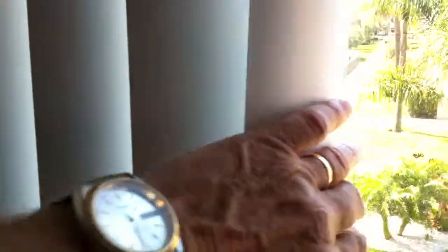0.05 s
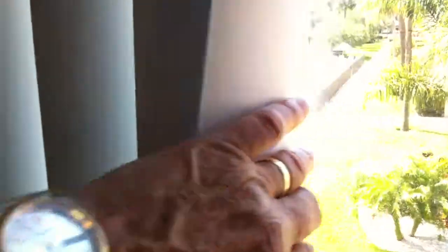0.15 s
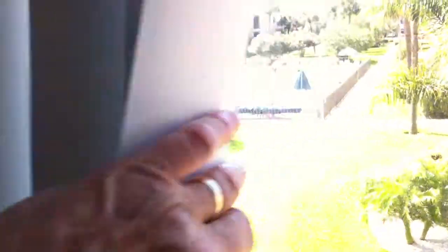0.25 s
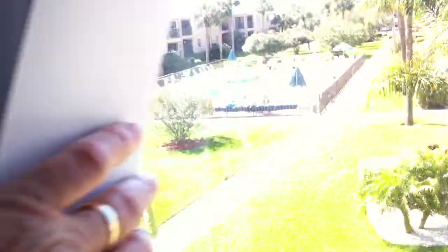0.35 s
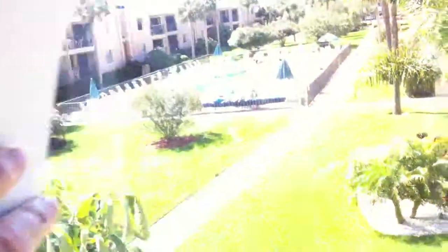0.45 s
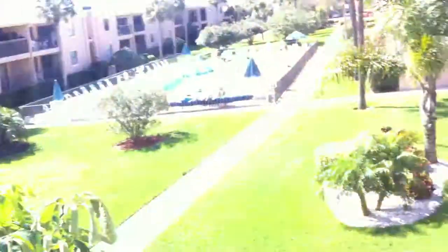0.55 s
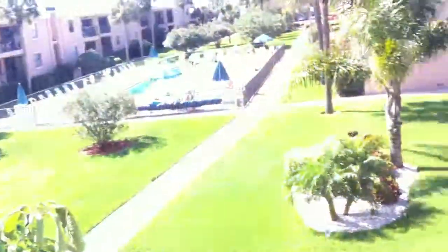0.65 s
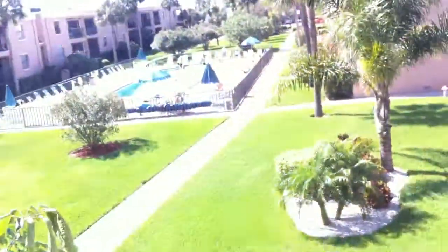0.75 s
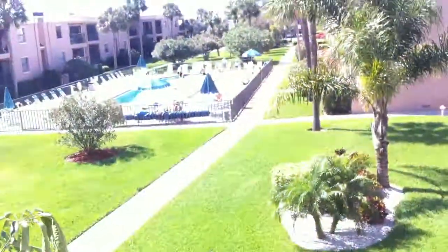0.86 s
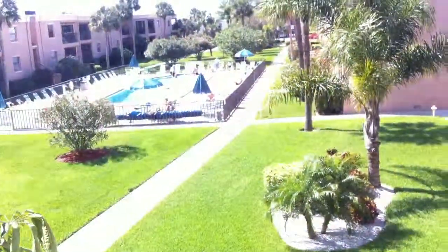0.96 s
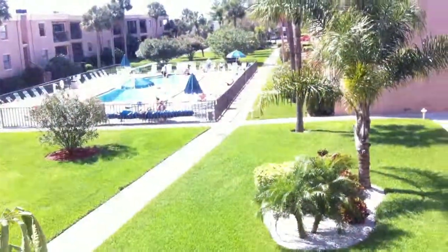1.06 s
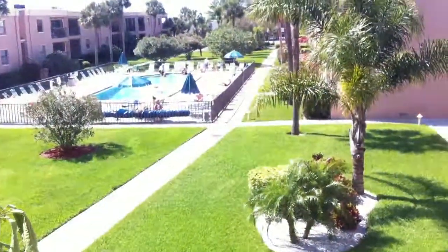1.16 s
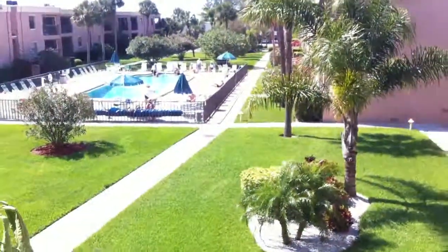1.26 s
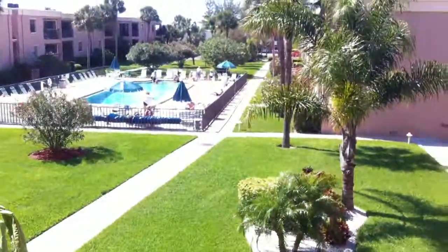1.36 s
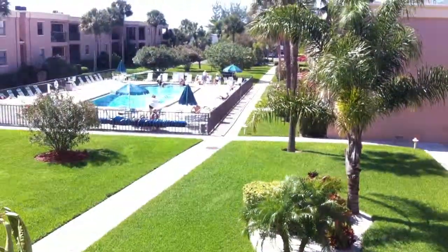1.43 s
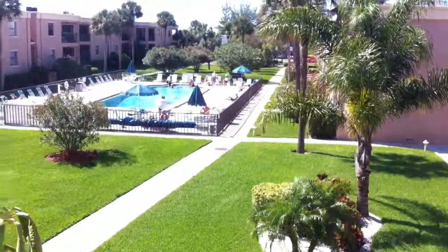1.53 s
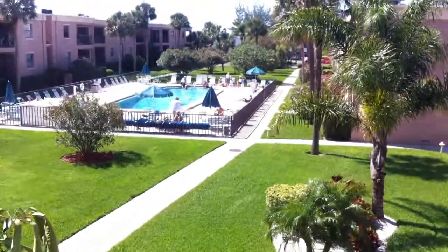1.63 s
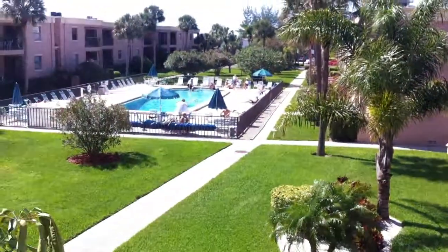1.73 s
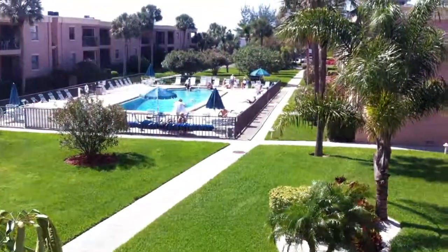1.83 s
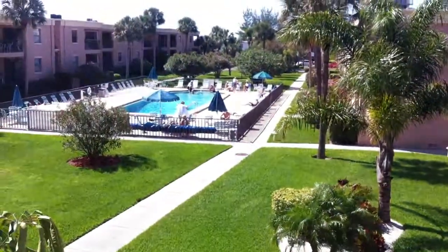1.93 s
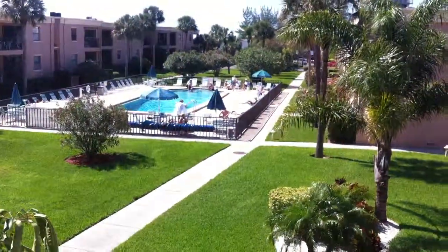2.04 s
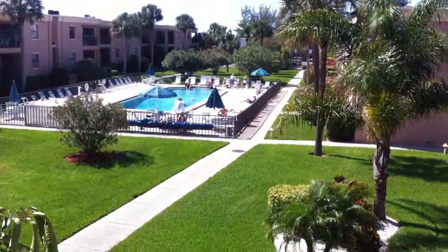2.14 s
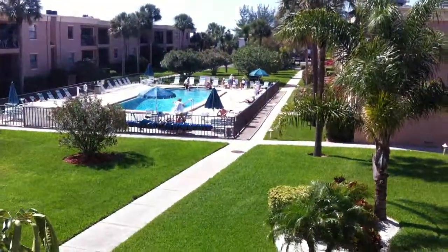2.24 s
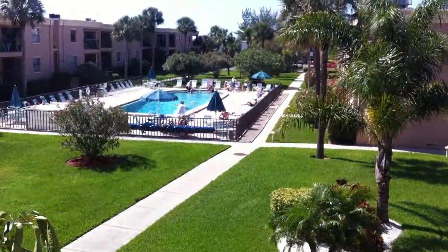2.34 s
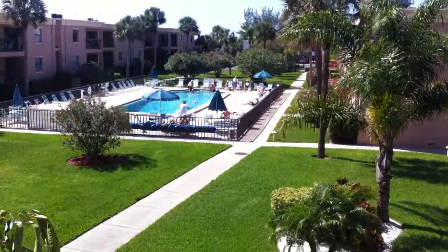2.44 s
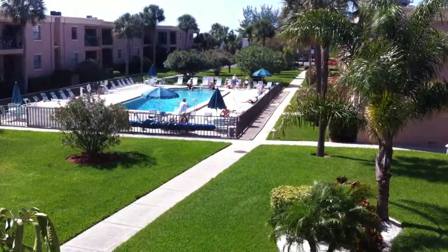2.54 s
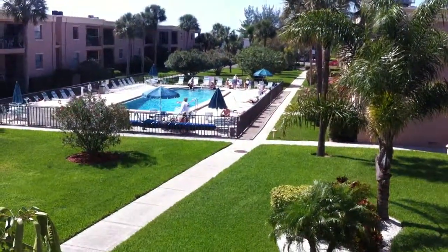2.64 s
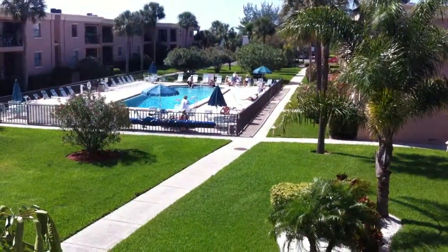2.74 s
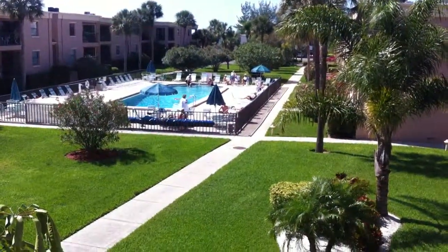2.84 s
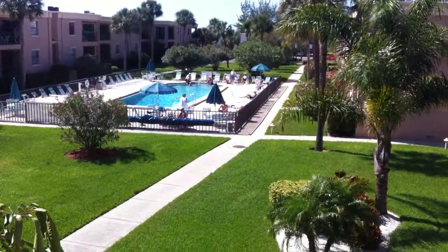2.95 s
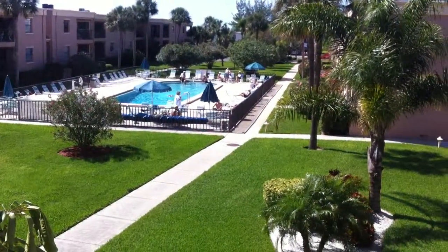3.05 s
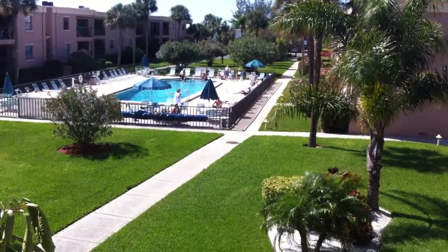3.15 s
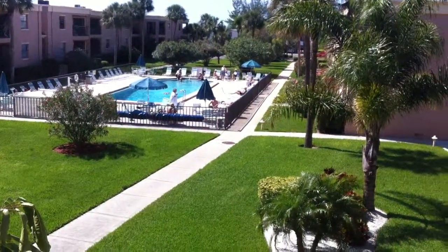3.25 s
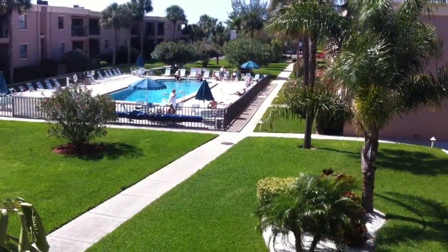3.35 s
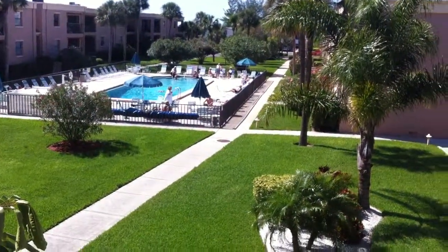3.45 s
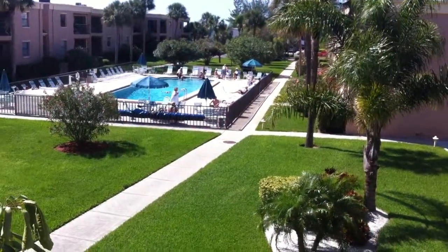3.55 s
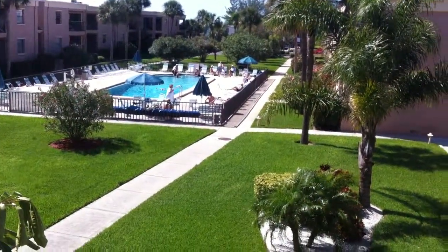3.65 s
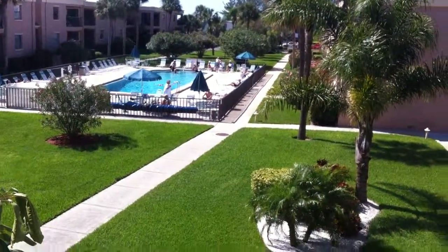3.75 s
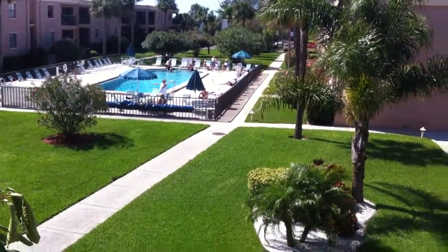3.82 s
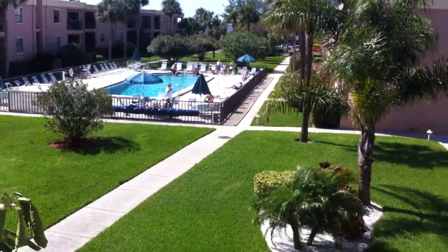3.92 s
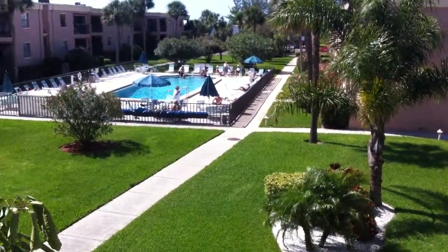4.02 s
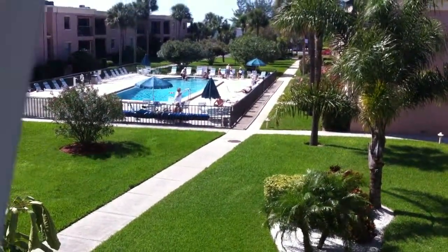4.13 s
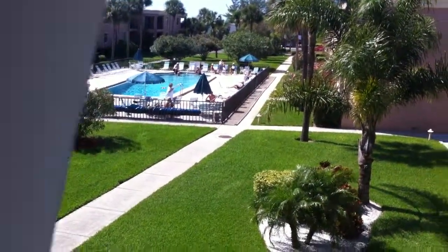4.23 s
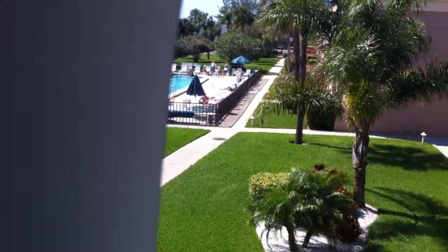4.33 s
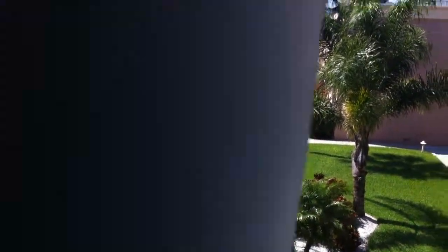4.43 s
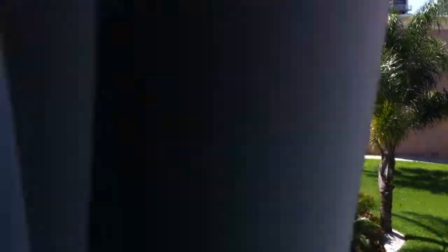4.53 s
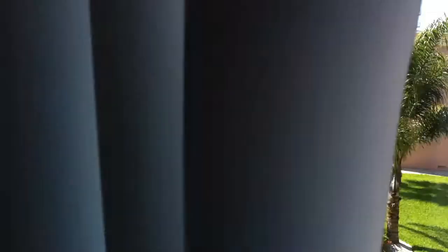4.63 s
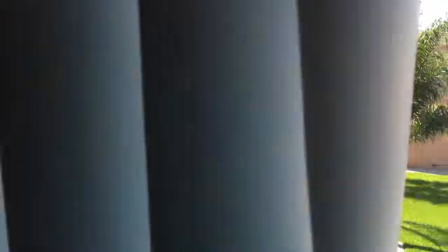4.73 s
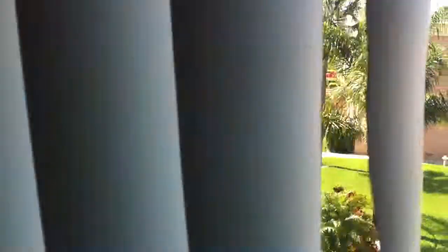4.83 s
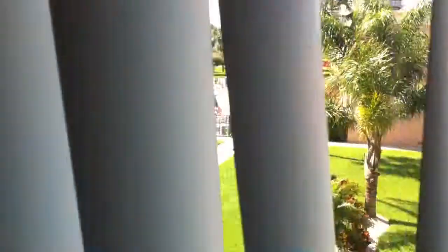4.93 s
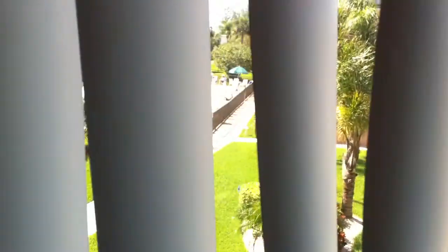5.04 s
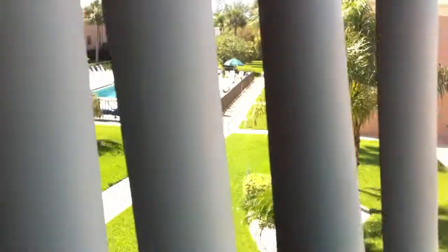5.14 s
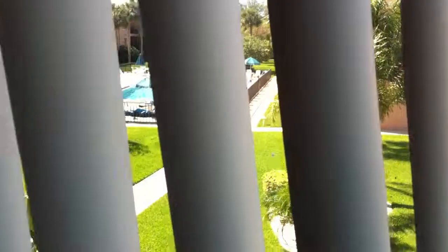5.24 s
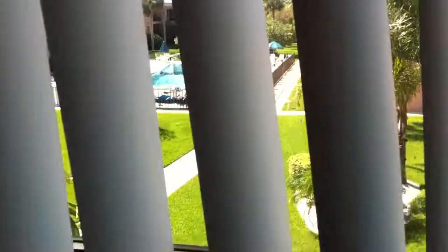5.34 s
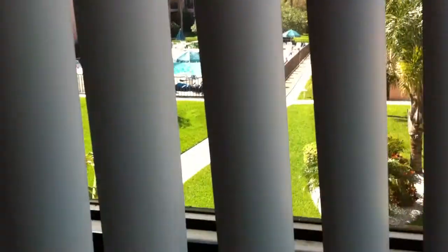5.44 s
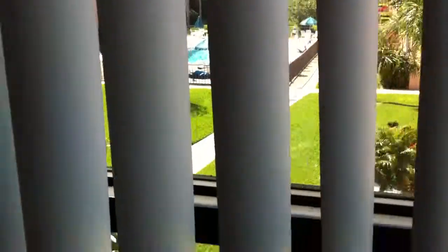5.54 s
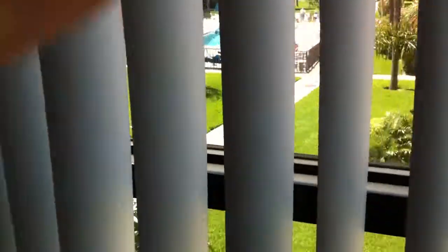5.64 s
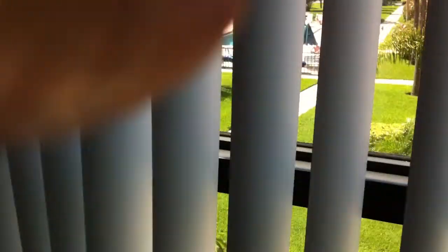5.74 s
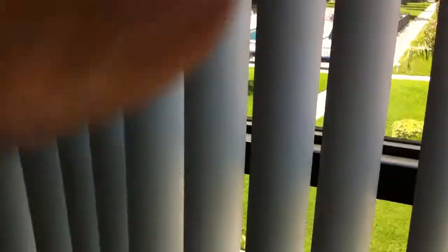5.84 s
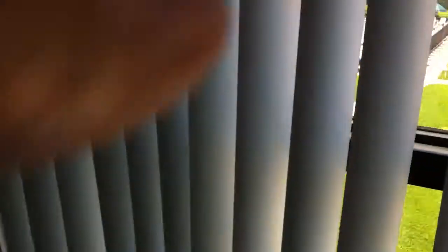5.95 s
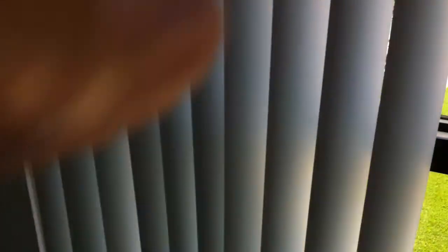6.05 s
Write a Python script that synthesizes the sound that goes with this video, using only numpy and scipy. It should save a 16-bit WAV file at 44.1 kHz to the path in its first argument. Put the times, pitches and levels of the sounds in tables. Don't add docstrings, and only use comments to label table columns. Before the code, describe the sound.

A dry, close clatter of vertical plastic blind slats in a small quiet room. A snap and light taps start at once; from about 0.28 to 0.46 seconds the slats are shoved together in hard, bright slaps and snaps with gritty scraping, and another strong slap lands at 0.72. Smaller clicks and rattles trail on past 1 second, with a firmer clack near 1.44 and softer, spaced taps until 2.5. A slap at 2.7 leads into tiny ticks, fading by 3.4 to near silence over low rumble and faint hiss. A duller clack at 3.9 brings a thin scrape, then clicks around 4.2. The released slats knock hollowly from 4.46, densest around 4.55, with another strong clack at 4.96 and a soft puff of air near 5. Sparse knocks at 5.6 and 5.8 and light scraping finish by 6 seconds, with a short room tail.

```python
import sys
import numpy as np
from scipy import signal
from scipy.fft import rfft, irfft
from scipy.io import wavfile
from scipy.ndimage import uniform_filter1d

SR = 44100
rng = np.random.default_rng(int(sys.argv[2]) if len(sys.argv) > 2 else 0)


def inscribe(sig):
    pcm = np.round(np.clip(np.atleast_2d(sig).T, -1, 1) * 32767)
    wavfile.write(sys.argv[1], SR, pcm.astype(np.int16))


def voltage_ratio(decibels):
    exponent = np.asarray(decibels, float) / 20
    return 10 ** exponent


N = 268128
LONG = 6000

# (time [s], peak level [dB], centre of the colour [Hz], contact [ms])
CRACKS = [
    (0.2777, -45, 4200, 0.38),
    (0.9837, -28.5, 3600, 0.35),
    (1.1981, -34, 3350, 0.3),
    (3.2891, -45.5, 3730, .35),
]
# (time [s], peak level [dB], pitch [Hz], t60 [s])
HELD_RINGS = [(0.284, -25, 646, 0.036), (0.284, -34.5, 1810, 0.09), (0.307, -33, 1650, 0.045),
              (0.374, -23, 2600, 0.03), (0.374, -33, 2440, 0.029), (0.386, -32, 1840, 0.045),
              (0.409, -31.5, 611, 0.068), (0.413, -28, 3120, 0.04), (0.415, -22.5, 2300, 0.022),
              (0.456, -34, 1530, 0.034), (0.463, -38, 2260, 0.023), (0.465, -37, 1920, 0.035),
              (0.722, -30, 1326, 0.11), (0.722, -29.5, 1177, 0.066), (0.722, -22, 1916, 0.033),
              (0.723, -30, 1570, 0.063), (0.723, -22.5, 1810, 0.029), (0.724, -32, 1680, 0.051),
              (0.725, -27.5, 447, 0.11), (0.729, -28, 570, 0.031), (0.853, -22, 1760, 0.029),
              (0.92, -36, 1715, 0.037), (0.928, -38, 407, 0.067), (1.436, -42, 853, 0.11),
              (1.437, -40, 1580, 0.046), (1.438, -30, 1515, 0.047), (1.441, -29, 630, 0.052),
              (1.75, -44, 1180, 0.089), (1.751, -42, 496, 0.18), (1.764, -44, 297, 0.088),
              (1.781, -36.5, 635, 0.046), (2.103, -46.5, 850, 0.045), (2.119, -48, 398, 0.11),
              (2.193, -49.5, 830, 0.1), (2.398, -44, 860, 0.095), (2.435, -38, 1075, 0.035),
              (2.436, -42, 555, 0.038)]
# (time [s], peak level [dB], pitch [Hz], t60 [s])
LATE_RINGS = [(2.704, -44, 632, 0.23), (2.704, -37, 1433, 0.05), (2.705, -30, 1914, 0.029),
              (2.706, -46, 1780, 0.028), (2.707, -40, 1123, 0.12), (3.896, -41.5, 1568, 0.091),
              (3.896, -34.5, 1316, 0.053), (3.897, -40, 874, 0.07), (3.898, -40.5, 1057, 0.069),
              (3.9, -46.5, 618, 0.31), (4.462, -44, 649, 0.15), (4.464, -38, 428, 0.088),
              (4.465, -39, 1114, 0.1), (4.469, -35, 258, 0.098), (4.538, -29, 1500, 0.039),
              (4.541, -28.5, 1030, 0.066), (4.547, -29.5, 653, 0.21), (4.56, -28, 1628, 0.072),
              (4.563, -30, 397, 0.062), (4.563, -29.5, 512, 0.11), (4.565, -37, 430, 0.07),
              (4.567, -37, 260.4, 0.29), (4.625, -38, 390, 0.089), (4.625, -37.5, 506, 0.12),
              (4.625, -32.5, 646, 0.055), (4.726, -38.5, 1740, 0.035), (4.726, -38, 2250, 0.029),
              (4.731, -39.5, 257, 0.11), (4.957, -27, 942, 0.055), (4.959, -31.5, 724, 0.062),
              (4.961, -30, 1047, 0.05), (4.962, -30, 1390, 0.032), (4.963, -28.5, 480, 0.035),
              (4.964, -34.5, 2060, 0.11), (5.596, -43, 1370, 0.099), (5.598, -37, 1021, 0.082),
              (5.6, -46, 1115, 0.07), (5.601, -46, 357, 0.085), (5.603, -35, 1520, 0.038),
              (5.815, -37, 830, 0.044), (5.815, -48, 1160, 0.1), (5.816, -42, 1250, 0.054),
              (5.818, -42.5, 1620, 0.095), (5.82, -39, 1010, 0.038), (5.83, -39, 1400, 0.046)]


def evened(x):
    return x / np.sqrt(np.mean(x ** 2) + 1e-20)


def topped(x):
    return x / (abs(x).max() + 1e-12)


def read(points, hz):
    f, value = np.transpose(points)
    return np.interp(np.log(hz + 1), np.log(f + 1), value)


def coloured(x, points, tilt_db=0):
    hz = np.fft.rfftfreq(len(x), 1 / SR)
    gain_db = read(points, hz) + tilt_db * np.log2(hz / 3000 + 1e-3)
    return irfft(rfft(x) * voltage_ratio(gain_db), len(x))


def filtered(x, order, hz, kind="low"):
    return signal.sosfilt(signal.butter(order, hz, kind, fs=SR, output="sos"), x)


def place(out, start, sound):
    out[start:start + len(sound)] += sound


def ring(modes, t, luck, detune, spread_db):
    hz, db, t60 = np.transpose(modes)[:, :, None]
    favour, shift = luck[:2 * len(hz)].reshape(2, -1, 1)
    level = voltage_ratio(db + spread_db * favour - 60 * t / t60)
    return (level * np.sin(2 * np.pi * hz * (1 + detune * shift) * t)).sum(0)


def crowd(noise, rattle, t, t60):
    energy = signal.fftconvolve(rattle ** 2, voltage_ratio(-120 * t / t60))[:len(t)]
    return evened(noise * np.sqrt(abs(energy)))


def hush():
    # (frequency [Hz], level [dB per Hz])
    hush_colour = [(12, -52.5), (20, -24), (27, -34), (53, -20), (91, -19.5), (113, -11.5), (187, -2.5),
                   (228, -13), (255, -6), (499, -17), (802, -18.5), (1330, -19), (16000, -26.5)]
    drift = evened(uniform_filter1d(uniform_filter1d(rng.standard_normal(N), 5000), 5000))
    level = voltage_ratio(-62.5) * voltage_ratio(.6 * drift)
    return level * evened(coloured(rng.standard_normal(N), hush_colour))


def room(x):
    # (frequency [Hz], t60 [s])
    decay = [(150, 0.69), (400, 0.43), (1000, 0.28), (2800, 0.31), (7000, 0.15), (14000, 0.27)]
    taps = np.zeros(SR // 2)
    at = np.arange(150, len(taps) - 20, 20)
    taps[at + rng.integers(0, 20, len(at))] = rng.choice([-1., 1.], len(at))
    hz, t, z = signal.stft(taps, SR, nperseg=256)
    fade = voltage_ratio(-60 * t / read(decay, hz)[:, None])
    tail = signal.istft(z * fade, SR, nperseg=256)[1]
    return signal.fftconvolve(x, tail / np.linalg.norm(tail))[:N]


def pushes():
    # (time [s], peak level [dB])
    puffs = [(.4, -65), (.495, -69), (0.723, -66), (.92, -65), (1.435, -66), (2.426, -74), (2.706, -73),
             (3.898, -71.5), (4.595, -66), (4.69, -70), (4.97, -64), (5.01, -57), (5.83, -72)]
    puff_hz, puff_s, lead = 46.2, 0.01, 2000
    out, t = np.zeros(N + LONG), np.arange(-lead, LONG - lead) / SR
    puff = np.exp(-.5 * (t / puff_s) ** 2) * np.sin(2 * np.pi * puff_hz * t)
    for s, db in puffs:
        place(out, round(s * SR) - lead, voltage_ratio(db) * puff)
    return out[:N]


def carriers():
    # (time [s], peak level [dB])
    ticks = [
        (2.75, -62),
        (2.917, -60),
        (2.992, -53),
        (3.062, -62),
        (3.173, -53),
        (3.4, -58),
    ]
    # (pitch [Hz], level [dB], t60 [s])
    modes = [(1080, -3, 0.048), (2420, 1, 0.043), (3800, -3, .05), (5600, 6, 0.072), (9600, 6, .04)]
    out, t = np.zeros(N + LONG), np.arange(LONG) / SR
    for s, db in ticks:
        touch = rng.standard_normal(300) * np.exp(-t[:300] / 0.0023)
        body = ring(modes, t, rng.standard_normal(10), detune=.006, spread_db=1)
        tick = signal.fftconvolve(body, touch)[:LONG]
        place(out, round(s * SR), voltage_ratio(db + 5.0) * topped(tick))
    return out[:N]


def scrape():
    # (brightness [dB], weight [dB], pressure curve of (time [s], level [dB]))
    strokes = [(1.5, 4, [(0, -43), (.06, -56.5), (.27, -64.5)]), (4.5, -5.5, [(.283, -32.5), (.332, -35),
               (.456, -32), (.562, -39.5), (.878, -51), (.98, -48.5)]), (1, 7, [(.98, -52), (1.42, -62)]),
               (-17, 5.5, [(1.42, -43.5), (1.55, -74), (1.74, -63)]), (0, 6, [(1.74, -50.5), (1.914, -63.5),
               (2.38, -66), (2.466, -76), (2.7, -99)]), (-9, 13, [(2.76, -67), (3, -92)]),
               (5.5, -1, [(3.897, -58), (3.948, -53.5), (3.984, -47), (4.032, -48), (4.054, -55.5),
               (4.16, -58)]), (4, -9.5, [(4.16, -47), (4.226, -53), (4.36, -48.5), (4.55, -45)]),
               (-5, 5.5, [(4.55, -33.5), (4.61, -50), (4.798, -56), (4.95, -64)]), (5, 5.5, [(4.96, -53),
               (5.178, -62), (5.438, -63.5), (5.55, -70)]), (9.5, 13, [(5.6, -85), (5.678, -69),
               (5.81, -72), (6.08, -68)])]
    # (frequency [Hz], level [dB per Hz])
    scrape_colour = [(59, -50), (100, 4), (872, 1), (1170, 4.5), (1450, -1.5), (1680, 5.5), (2930, 3.5),
                     (3400, 2), (9410, -6.5), (16000, -14.5)]
    t, gain, bright, weight = np.arange(N) / SR, np.zeros(N), np.zeros(N), np.zeros(N)
    for bright_db, weight_db, rows in strokes:
        s, db = np.transpose(rows)
        on = (t >= s[0]) & (t < s[-1])
        gain[on] = voltage_ratio(np.interp(t[on], s, db)) * signal.windows.tukey(on.sum(), .02)
        bright[on], weight[on] = voltage_ratio(bright_db), voltage_ratio(weight_db)
    clumps = evened(uniform_filter1d(uniform_filter1d(rng.standard_normal(N), 160), 160))
    slips = voltage_ratio(2.1 * rng.exponential(1, N).clip(0, 4))
    grit = rng.standard_normal(N) * voltage_ratio(.8 * clumps) * slips
    grit = evened(coloured(grit, scrape_colour))
    low = signal.sosfiltfilt(signal.butter(2, 1300, fs=SR, output="sos"), grit)
    high = signal.sosfiltfilt(signal.butter(2, 6000, "high", fs=SR, output="sos"), grit)
    return gain * (grit - low - high + weight * low + bright * high)


def clicks():
    # (time [s], peak level [dB])
    flicks = [(0.2844, -21), (.4559, -12), (.7227, -11), (1.1984, -28), (1.583, -38.5), (1.631, -32.5),
              (3.2902, -33.5), (4.1647, -31), (4.192, -31), (4.2598, -21), (4.565, -25), (5.0512, -24)]
    rows = [(s, db + 9, hz, 0.000157) for s, db, hz, _ in CRACKS]
    rows += [(s, db, 10040, .00004) for s, db in flicks]
    out, t = np.zeros(N + LONG), np.arange(100) / SR
    for s, db, hz, width in rows:
        u = t - 4 * width
        packet = np.exp(-.5 * (u / width) ** 2) * np.sin(2 * np.pi * hz * u)
        place(out, round(s * SR), voltage_ratio(db) * packet)
    return out[:N]


def ringing():
    # (time [s], peak level [dB], pitch [Hz])
    bumps = [(.292, -39, 272), (0.387, -37, 274), (0.742, -30.5, 157), (.752, -39, 366), (1.123, -38, 194),
             (1.323, -44, 190), (1.628, -43, 175), (3.906, -39, 202), (4.544, -34, 259), (4.724, -38, 190),
             (4.96, -32.5, 190), (5.621, -43.5, 361), (5.646, -48.5, 400)]
    out, t = np.zeros(N + LONG), np.arange(LONG) / SR
    for s, db, hz, t60 in HELD_RINGS + LATE_RINGS + [(s, db, hz, .07) for s, db, hz in bumps]:
        rise = 1 - np.exp(-t / (0.0016 * (1000 / hz) ** 0.72))
        tone = rise * np.sin(2 * np.pi * hz * t)
        place(out, round(s * SR), voltage_ratio(db + 4.5 - 60 * t / t60) * tone)
    return out[:N]


def contacts():
    # (time [s], peak level [dB], loudest ring [Hz], thump [dB re peak])
    taps = [(0.1974, -38, 2430, -14), (0.4124, -15, 2950, -10), (0.895, -33, 1900, -4.5),
            (0.9915, -28, 1640, -24), (1.3232, -48, 953, -23), (1.499, -43, 2430, -3),
            (1.889, -38.5, 1086, -20), (1.9142, -41.5, 2860, -10), (1.95, -42.5, 995, -15),
            (2.0278, -59, 2130, -18), (2.1238, -46.5, 2490, -5), (2.2148, -42.5, 2370, -4),
            (2.244, -37, 2400, -19), (2.435, -28.5, 984, -11.5), (2.4493, -42.5, 2830, -4.5),
            (2.4878, -48, 2330, -7), (2.517, -51, 2340, -11), (2.69, -45.5, 2500, -11),
            (2.749, -37, 2420, -1.5), (2.7981, -58, 1910, -5), (3.309, -55, 1650, -23),
            (3.3484, -42.5, 2310, -13.5), (3.3856, -49, 2300, -23), (3.641, -53.5, 2260, -9.5),
            (4.2783, -33, 3190, -16), (4.486, -26.5, 4330, -13.5), (4.6952, -33, 3170, -8),
            (5.3481, -52, 2600, -13), (5.793, -40.5, 1965, -33)]
    # (time [s], peak level [dB], loudest ring [Hz], tick [dB re peak])
    glances = [(0.096, -46.5, 2330, -31), (0.1523, -42, 2560, -22), (0.3738, -12.5, 2510, -12),
               (.537, -28, 2660, -11.5), (0.663, -31, 2510, -30), (0.7978, -35, 2370, -39),
               (0.853, -22, 1740, -7), (1.039, -26.5, 1670, -18.5), (1.15, -34.5, 2390, -18.5),
               (1.1975, -28.5, 1620, -14.5), (1.2167, -40, 1790, -24.5), (1.274, -36.5, 1010, -24),
               (1.721, -42.5, 2300, -10), (1.804, -41.5, 2300, -29), (2.1779, -36.5, 2300, -16.5),
               (2.261, -37.5, 2420, -21.5), (2.463, -39, 2390, -23), (2.6509, -34.5, 2910, -20),
               (2.666, -50, 2900, -31), (2.9162, -52, 1120, -11), (2.992, -51, 1090, -10.5),
               (3.0602, -43, 2300, -29), (3.073, -47, 2390, -13.5), (3.1734, -56, 1030, -2.5),
               (3.1986, -48, 2180, -10.5), (3.239, -51.5, 2420, -15), (3.3981, -47.5, 2870, -15),
               (3.413, -48.5, 2300, -19.5), (4.759, -37.5, 3050, -14.5), (4.808, -29, 2650, -28)]
    # (time [s], peak level [dB], centre of the colour [Hz], tick [dB re peak], contact [ms])
    slaps = [(.055, -42.5, 890, -38, 2.5), (0.181, -44.5, 1660, -23, 2.4),
             (0.285, -24.5, 1770, -5, 2.1), (0.3886, -13, 1890, -17, 3.6),
             (0.7212, -10, 1740, -19, 9.2), (0.9115, -29.5, 1440, -10.5, 3.3),
             (0.92, -24, 1660, -19, 2.4), (1.1127, -36, 1990, -11.5, 5.3), (1.4248, -37, 820, -48, 12),
             (1.4371, -21, 1460, -27, 3), (1.5798, -39, 3350, -17, 1.9),
             (1.6285, -50.5, 970, -5.5, 12), (1.7495, -24, 1165, -28, 2.1),
             (1.7741, -30, 930, -28, 5.5), (2.1008, -40, 910, -19.5, 21),
             (2.192, -30.5, 890, -23.5, 7.2), (2.3956, -34.5, 910, -36, 4.9),
             (2.7035, -21.5, 1810, -35, 5.2), (2.7683, -51.5, 890, -9.5, 10.6),
             (3.8944, -25.5, 1240, -32, 10.5),
             (4.193, -38.5, 3220, -2.5, 4.9), (4.2528, -37, 2400, -7, 13),
                  (4.4598, -19, 1110, -27, 9.1), (4.5338, -15, 1430, -27.5, 3.9),
                  (4.5464, -11.5, 1030, -27, 3.9), (4.563, -10, 1695, -45, 2),
                  (4.613, -25.5, 1860, -28.5, 21), (4.629, -25.5, 1280, -26.5, 3.2),
                  (4.6755, -32, 1710, -39, 2.9), (4.725, -26, 1810, -24, 6.8),
                  (4.7802, -44.5, 3000, -13, 13), (4.9184, -44.5, 2170, -16.5, 11),
                  (4.957, -13.5, 1006, -27.5, 3.1), (4.9687, -22.5, 940, -20.5, 1.4),
                  (4.994, -30, 1570, -5, 8.6), (5.301, -47, 1670, -11, 3.5), (5.5943, -26, 1384, -54, 2.4),
                  (5.6024, -29, 1120, -31, 6.5), (5.666, -47.5, 1030, -24, 4.2),
                  (5.8137, -22.5, 1030, -40.5, 12), (5.882, -47, 1560, -29, 19)]
    # (time [s], peak level [dB], centre of the colour [Hz], tick [dB re peak])
    snaps = [(0.02, -30, 4400, -9), (0.304, -32.5, 4840, 4), (.324, -37, 3400, 2.5), (0.343, -40, 3540, 10),
             (0.3678, -22, 2560, -1), (0.4566, -12.5, 1500, -13), (0.463, -19.5, 2230, -16),
             (0.772, -36, 1720, -3.5), (1.05, -29.5, 2480, -16), (1.0704, -29.5, 1660, -17.5),
             (1.164, -29.5, 2280, -14.5), (1.262, -35.5, 2350, -15.5), (1.284, -35, 1970, -30),
             (1.35, -42, 1690, -8), (1.611, -49.5, 940, -12), (1.6554, -45, 2400, -3),
             (1.815, -48.5, 1660, -5.5), (2.1701, -41, 2630, -12), (4.163, -32.5, 2980, -16),
             (4.982, -32, 1440, -10), (5.0486, -41, 1380, -6.5), (5.1313, -26.5, 4830, -13.5),
             (5.169, -39, 2120, -33), (5.1886, -33, 2370, -18), (5.456, -50, 2450, -20),
             (5.702, -42.5, 2300, -28), (5.7536, -42, 2200, -18), (5.9237, -43, 1000, -24),
             (5.965, -41.5, 2110, -18.5), (6.008, -47.5, 1110, -14), (.259, -44, 2300, -25),
             (0.4496, -28, 2970, -6), (0.6236, -42.5, 2520, -1), (1.414, -56, 2300, -27),
             (2.428, -34, 2530, -31), (4.6198, -38, 2500, -8.5), (5.349, -58.5, 3530, 3.5),
             (5.691, -47, 2480, -23), (5.8, -71, 910, -40)]
    # (time [s], peak level [dB], centre of the colour [Hz], tick [dB re peak], contact [ms])
    blows = [
        (0.7241, -10.5, 2940, -27, 5),
        (2.7048, -21.5, 2190, -31, 0.4),
        (5.6033, -33.5, 1750, -27, 1),
        (5.8165, -28, 1690, -36, 0.93),
    ]
    rows = [(s, db, hz, thump_db, -19, 5.8, 5) for s, db, hz, thump_db in taps]
    rows += [(s, db, hz, -39.5, tick_db, 3.9, 6) for s, db, hz, tick_db in glances]
    for s, db, hz, tick_db, ms in slaps:
        thump_db = -9 - 0.1129 * (db + 33.5)
        rows.append((s, db, hz, thump_db, tick_db, ms, -8))
    rows += [(s, db, hz, -39, tick_db, 3.67, -8) for s, db, hz, tick_db in snaps]
    rows += [(s, db, hz, -42, -9.5, ms, -12) for s, db, hz, ms in CRACKS]
    return rows + [(s, db, hz, -42, tick_db, ms, -12) for s, db, hz, tick_db, ms in blows]


def knock(db, hz, thump_db, tick_db, ms, clear_db, noise_db):
    # (frequency [Hz], level [dB per Hz])
    thump_colour = [(59, -45), (100, -23.5), (227, -9.5), (524, -11), (642, -11), (778, -8), (1000, -10),
                    (1300, -48), (2200, -120)]
    # (pitch [Hz], level [dB], t60 [s])
    bend_modes = [(142, -8.5, 0.054), (280, -3.5, 0.021), (390, -8, 0.17), (499, -3, 0.097),
                  (628, 2.5, 0.14), (851, -8.5, 0.082), (1030, -47, 0.077)]
    # (pitch [Hz], level [dB], t60 [s])
    cross_modes = [(1158, -10, 0.13), (1810, -10, 0.037), (2300, 4.5, 0.043), (2510, 4.5, 0.077),
                   (3085, 1.5, 0.062), (3616, 5.5, 0.035), (4400, -9, 0.071), (5490, -8.5, 0.037),
                   (6700, -4.5, 0.068), (8570, -38, 0.0205)]
    # (frequency [Hz], level [dB per Hz])
    tick_colour = [(2470, -7.5), (4200, 0), (4800, 0), (5680, -1.5), (8650, -4), (13300, -12),
                   (16000, -8.5)]
    t = np.arange(LONG) / SR
    luck, dice = rng.standard_normal(64), rng.random(LONG)
    grit, mid, low, high = rng.standard_normal((4, LONG))

    span = max(ms, .3) / 1000
    rise_s = 0.000067 + 0.097 * span * voltage_ratio(-0.35 * (db + 43.5))
    touch = (1 - np.exp(-t / rise_s)) * np.exp(-t / span)
    rattle = touch * grit.clip(-1.6, 1.6) * (0.5 + (dice < .08))

    modes = ring(cross_modes, t, luck, detune=0.035, spread_db=4.5)
    spot = ring([(hz, 0, .045), (hz * 1.04, -6, .045)], t, luck, 0, 0)
    bends = ring(bend_modes, t, luck[24:], detune=0.008, spread_db=-2.0)
    driven = signal.fftconvolve(rattle[None], [modes, spot, bends], axes=1)[:, :LONG]
    modes, spot, bends = map(evened, driven)

    broad_hz = max(hz, 1400)
    hump = filtered(crowd(mid, rattle, t, 0.062), 2, [broad_hz / 1.7, broad_hz * 1.64], "band")
    under = filtered(crowd(mid[::-1], rattle, t, 0.54), 2, [broad_hz / 3.1, broad_hz / 0.83], "band")
    body = hump + voltage_ratio(-13.5) * under
    clear = voltage_ratio(-1.5) * modes * min(1, 1.5 + clear_db / 10) + voltage_ratio(1.5) * spot
    slat = evened(body) + voltage_ratio(clear_db) * clear
    dull_hz = min(1.74 * broad_hz * voltage_ratio(2.15 * max(tick_db + 29.0, 0)), 18000)
    slat = filtered(filtered(slat, 2, dull_hz), 2, dull_hz)

    thump = crowd(coloured(low, thump_colour), rattle, t, 0.17)
    thump = thump * (1 - np.exp(-t / 0.0028)) + voltage_ratio(-3.5) * bends

    tick = evened(rattle) + 0.95 * crowd(high + 0.5 * np.roll(high, 1), rattle, t, 0.12)
    fine_modes = [(f, 0, .05) for f in np.geomspace(3400, 13000, num=16)]
    fine = ring(fine_modes, t, luck[::-1], detune=.04, spread_db=5)
    fine = evened(signal.fftconvolve(rattle, fine)[:LONG])
    tick += 0.51 * (clear_db > 0) * fine
    edge = np.add(tick_colour, np.outer(3.0 * luck[-len(tick_colour):], [0, 1]))
    tick = coloured(tick, edge, 0.06 * (db + tick_db + 61.0))
    tick = filtered(tick, 2, min(10000 * voltage_ratio(max(tick_db + 23, 0)), 18000))

    main = voltage_ratio(noise_db) * (topped(slat) + voltage_ratio(thump_db + 1.5) * topped(thump))
    return voltage_ratio(db) * (main + voltage_ratio(tick_db + 14.0 + noise_db * (clear_db > 0)) * topped(tick))


def knocks():
    out = np.zeros(N + LONG)
    for s, *rest in contacts():
        rung = any(0 <= row[0] - s + .004 < .012 for row in HELD_RINGS + LATE_RINGS)
        place(out, round(s * SR), knock(*rest, -6 * rung))
    return out[:N]


def scene():
    blinds = carriers() + scrape() + clicks() + ringing() + knocks()
    blinds = filtered(blinds, 6, 128, "high")
    return (blinds + voltage_ratio(-11.5) * room(blinds) + hush() + pushes())[None]


def roll_off(x):
    return signal.sosfilt(signal.butter(12, 16640, fs=SR, output="sos"), x)


def record(dry):
    cut = signal.oaconvolve(dry[0], signal.firwin(255, 15900, fs=SR), "same")
    return roll_off(cut)


dry = scene()
out = record(dry)
inscribe(out)
```